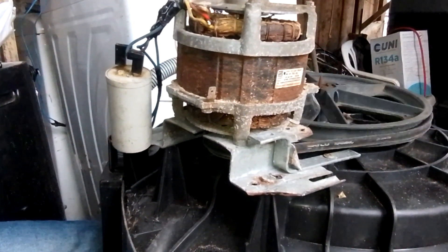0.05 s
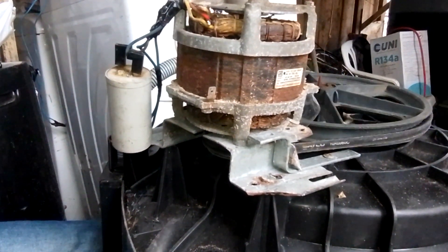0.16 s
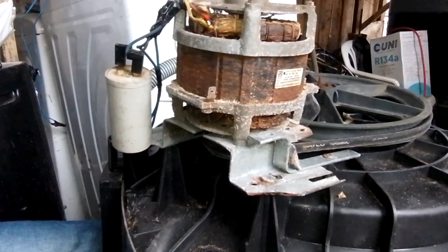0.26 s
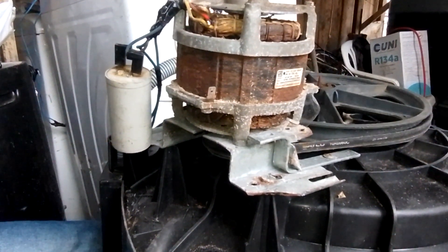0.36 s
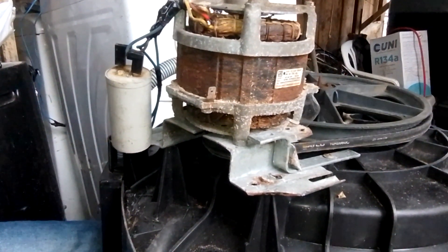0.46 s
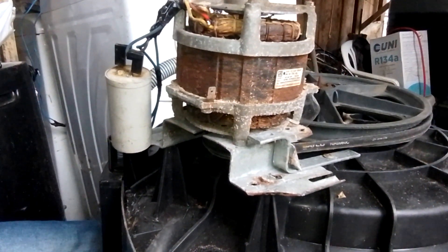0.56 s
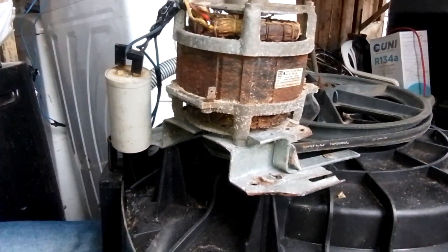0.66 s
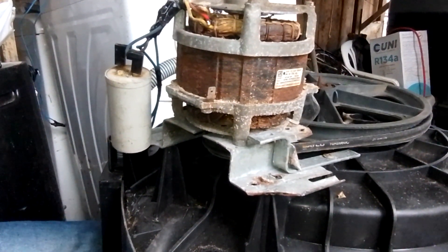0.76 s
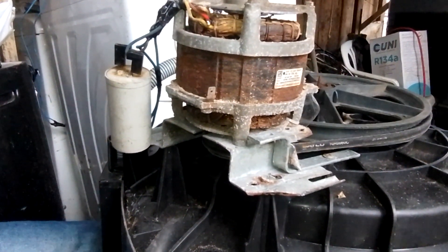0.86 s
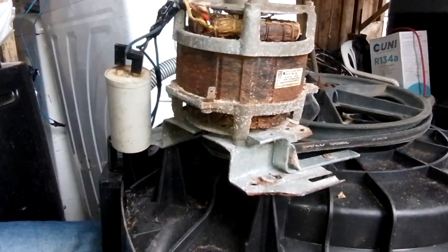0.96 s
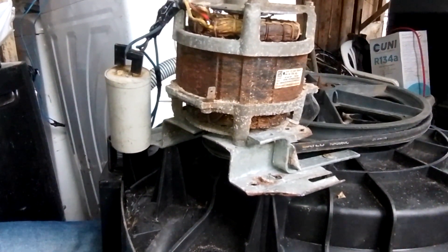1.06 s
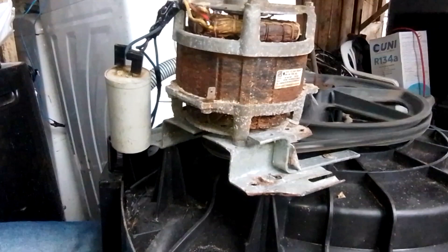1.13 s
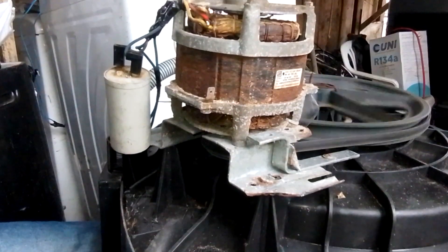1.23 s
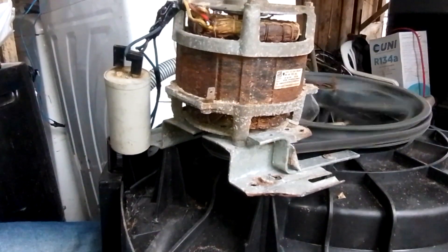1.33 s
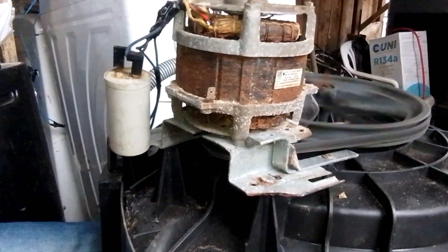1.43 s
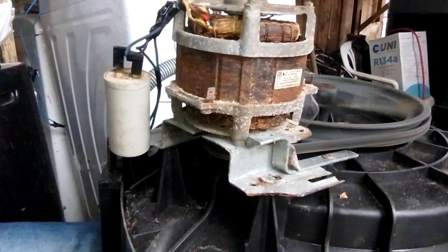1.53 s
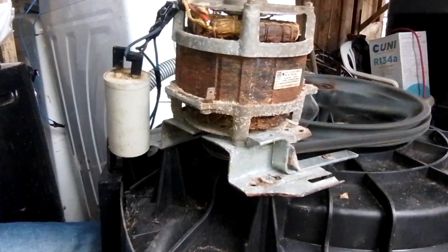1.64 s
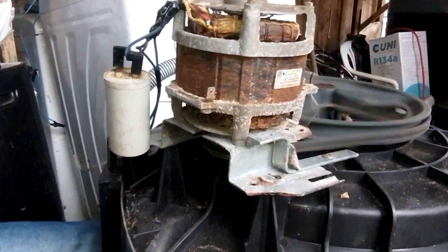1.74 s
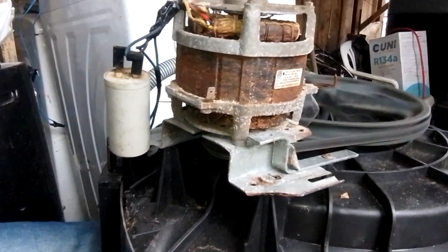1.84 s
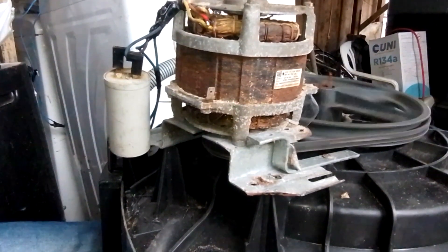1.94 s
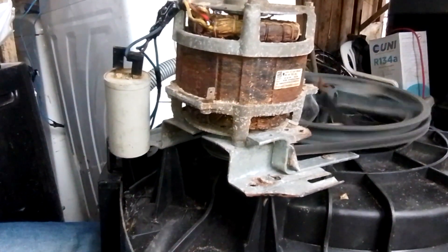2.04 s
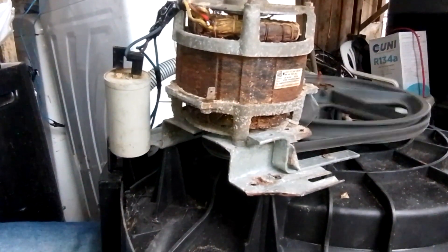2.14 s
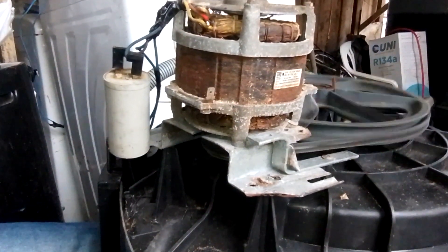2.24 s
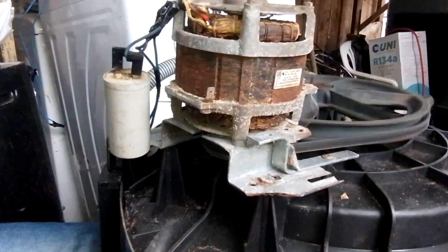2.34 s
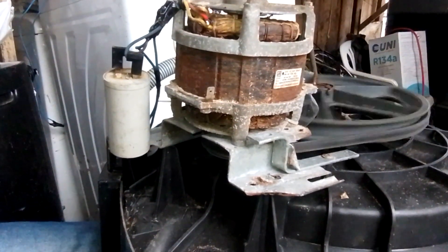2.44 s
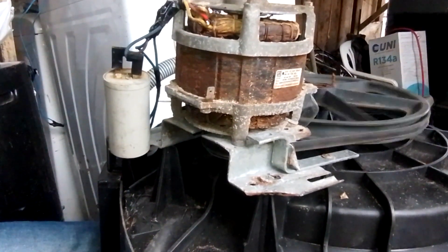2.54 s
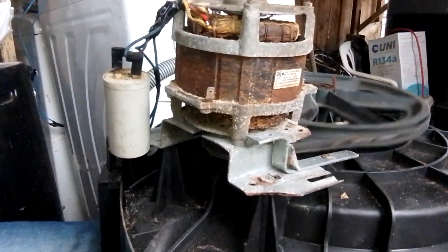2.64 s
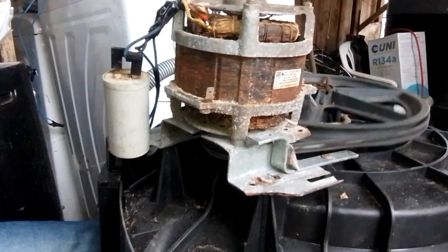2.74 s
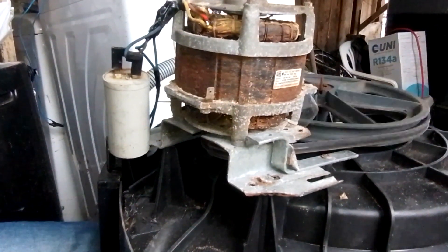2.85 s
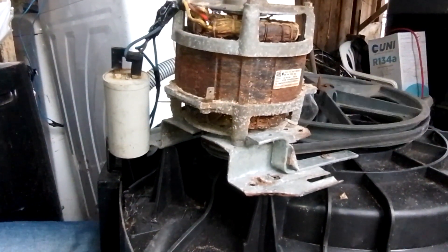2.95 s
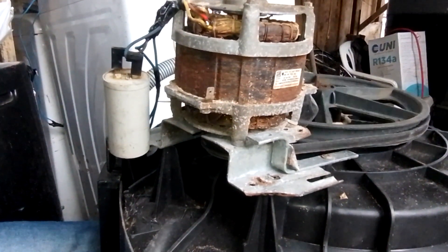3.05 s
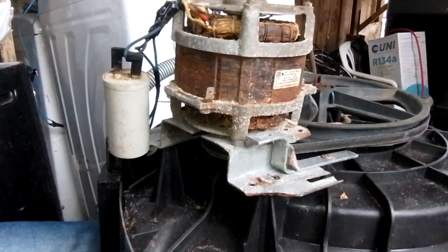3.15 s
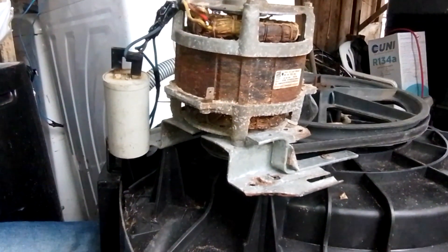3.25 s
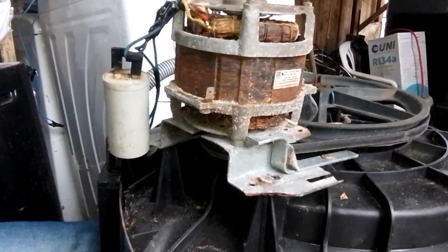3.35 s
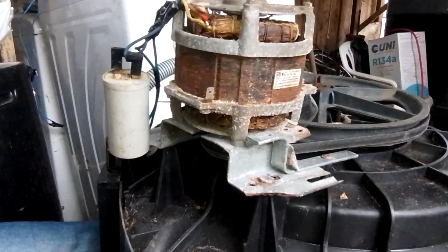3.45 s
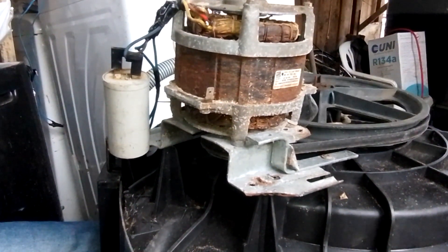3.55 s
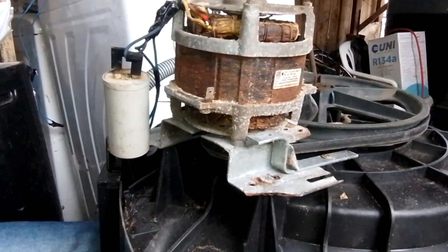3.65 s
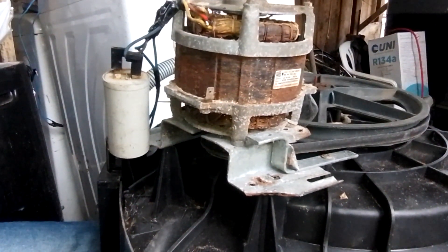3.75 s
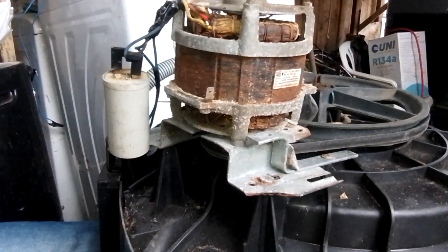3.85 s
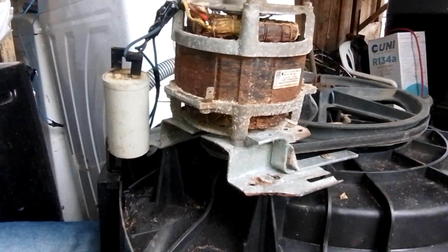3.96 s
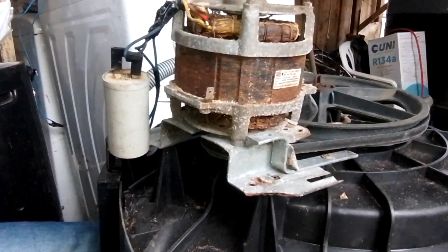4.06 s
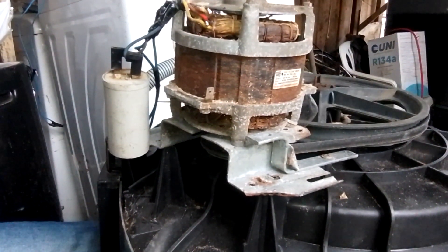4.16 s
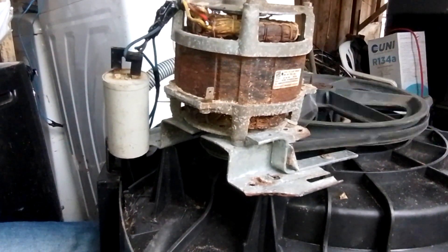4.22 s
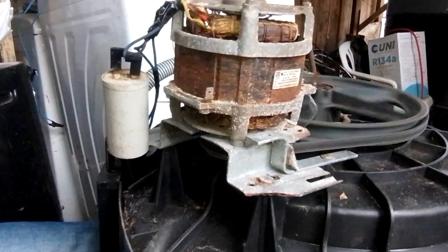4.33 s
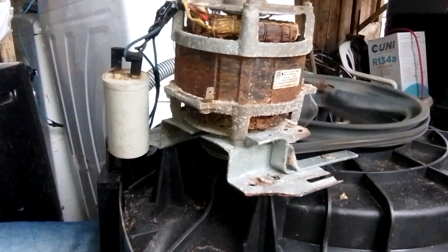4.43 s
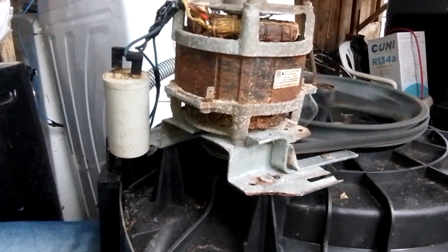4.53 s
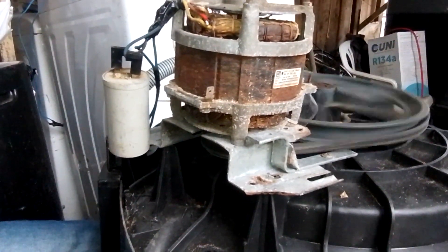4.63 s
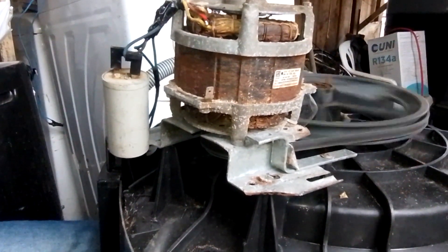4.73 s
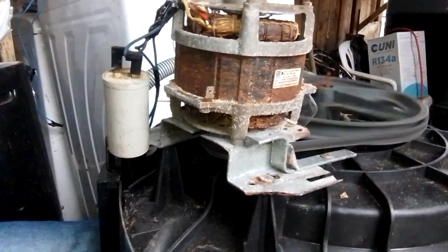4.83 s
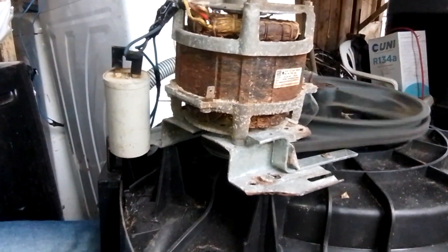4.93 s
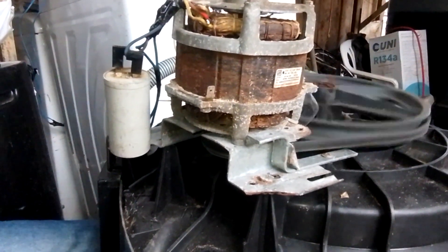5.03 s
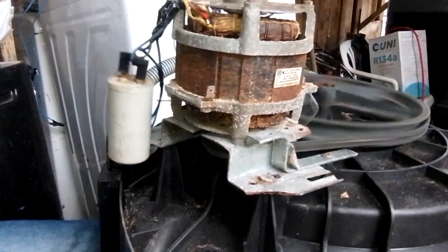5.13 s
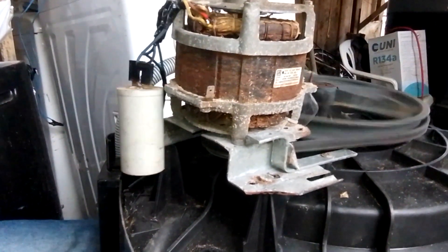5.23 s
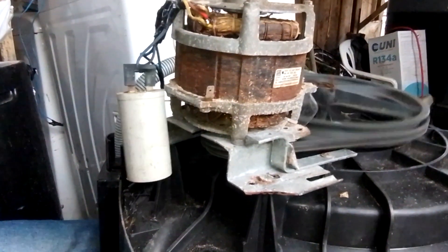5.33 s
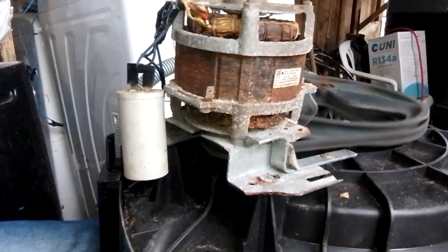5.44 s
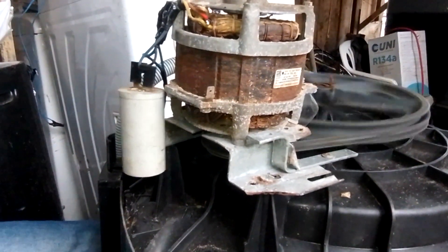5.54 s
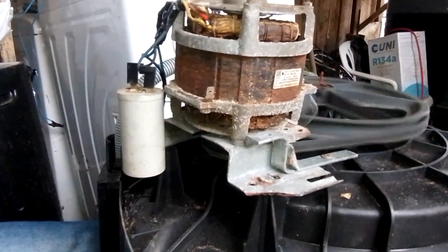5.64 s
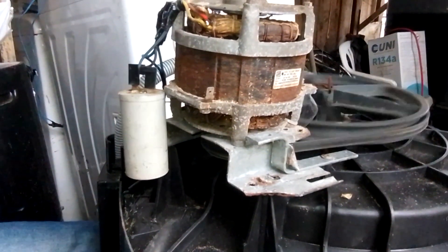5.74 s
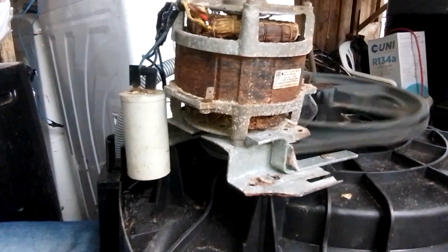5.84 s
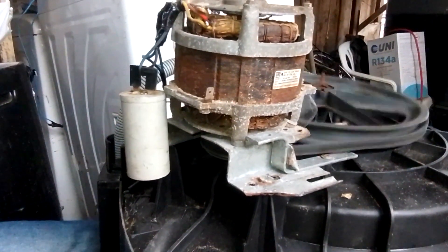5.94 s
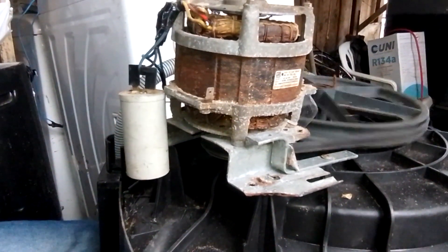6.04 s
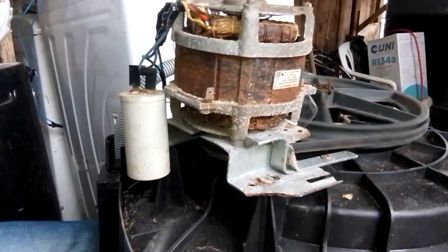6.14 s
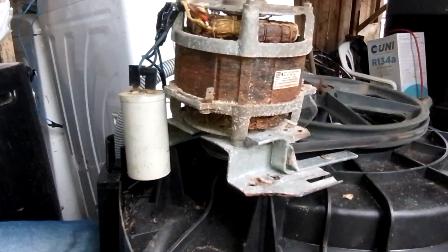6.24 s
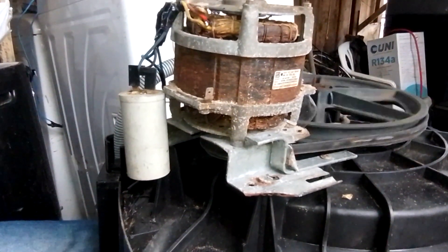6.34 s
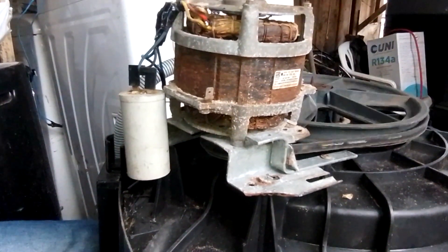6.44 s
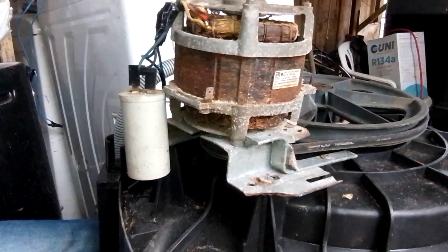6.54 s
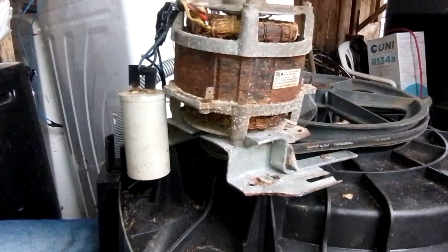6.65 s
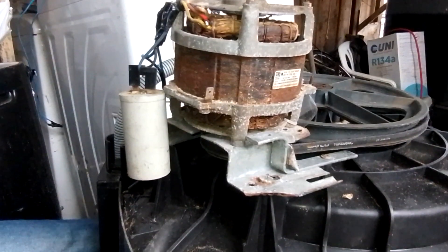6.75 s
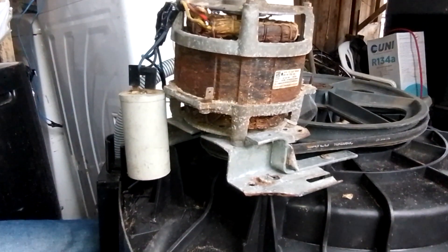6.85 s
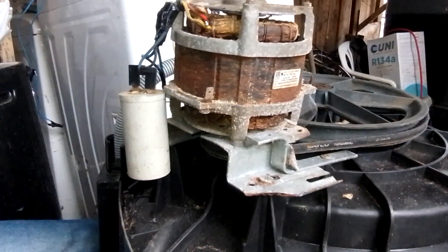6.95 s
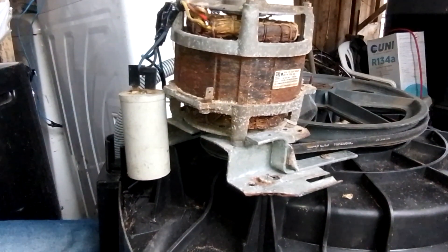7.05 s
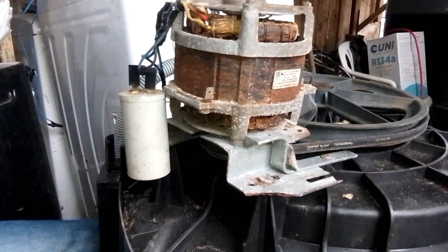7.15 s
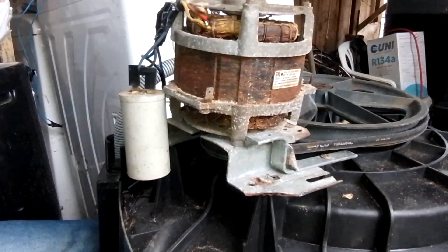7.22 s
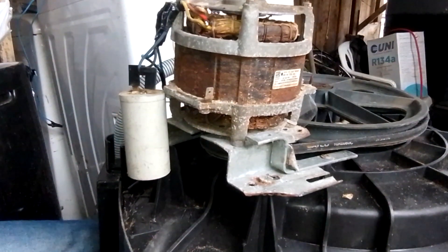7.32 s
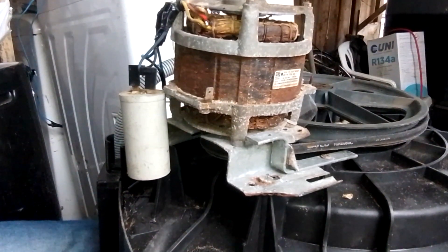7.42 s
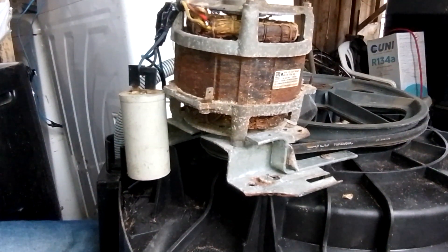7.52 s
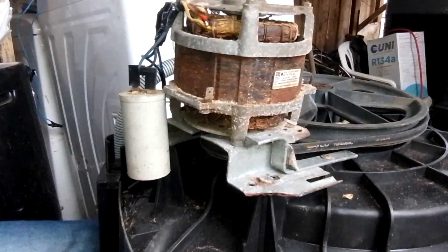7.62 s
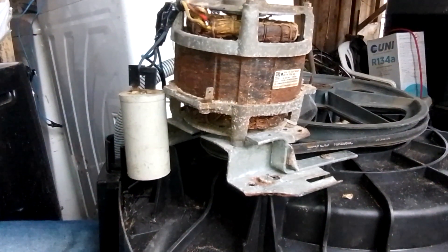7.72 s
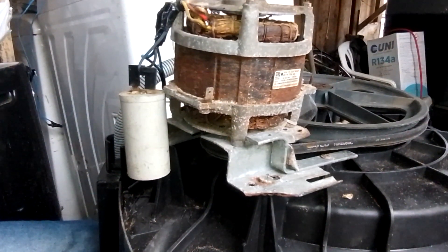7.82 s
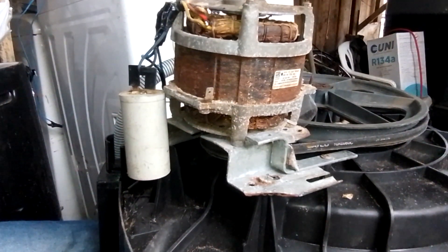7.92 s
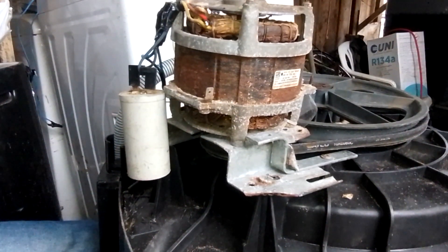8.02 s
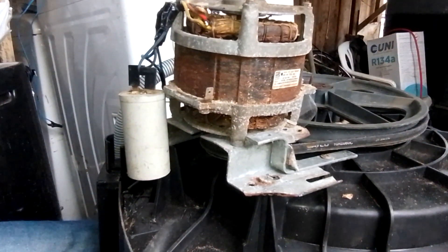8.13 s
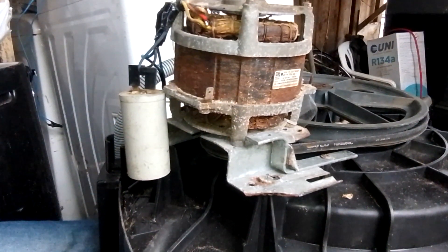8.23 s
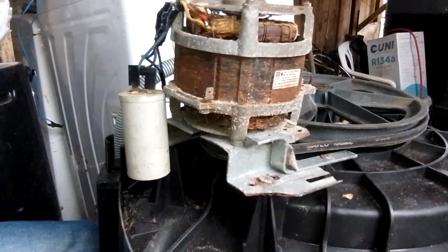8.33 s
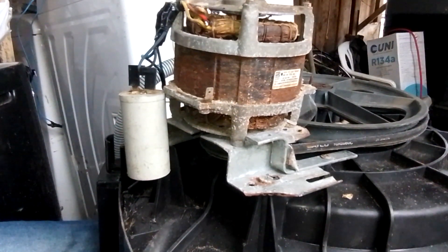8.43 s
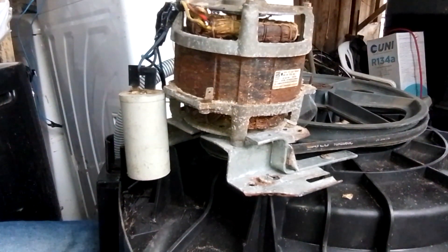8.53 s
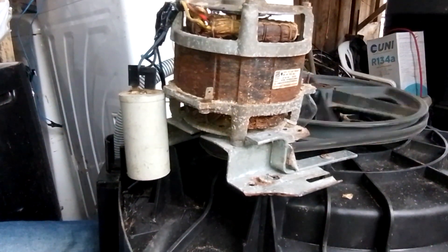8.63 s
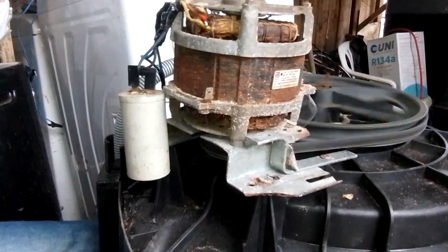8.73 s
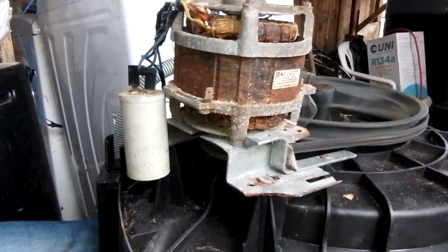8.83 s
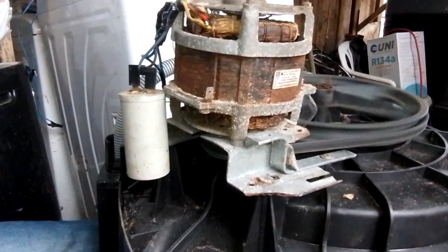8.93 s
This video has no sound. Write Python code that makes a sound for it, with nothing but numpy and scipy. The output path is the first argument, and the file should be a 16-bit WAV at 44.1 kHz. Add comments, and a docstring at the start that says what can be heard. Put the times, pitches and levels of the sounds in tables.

```python
"""Worn motor on a plastic tub

In a quiet shed, close to the microphone, a worn electric motor is run up three times, belting a pulley round.
Bearing chatter, made of random taps, rings the frame, tub and races as resonances over a hum of sine tones.
In the first two runs short pushes and puffs make the pulley's knocks, which spread out and stop.
Fingers click on the switch as filtered noise; drone, murmur, a thin chirr and faint tones fill the shed."""
import sys
import numpy as np
from scipy.fft import rfft, irfft, next_fast_len
from scipy.io import wavfile
from scipy.ndimage import uniform_filter1d, map_coordinates

SR = 44100
rng = np.random.default_rng(int(sys.argv[2]) if len(sys.argv) > 2 else 0)


def to_wav(s):
    """Save 16-bit WAV."""
    ch = np.atleast_2d(s).T  # columns
    pcm = np.round(np.clip(ch, -1, 1) * 32767)  # PCM
    wavfile.write(sys.argv[1], SR, pcm.astype(np.int16))


N = 396018  # samples, about 9 s

# knocks of the turning pulley: (t/s, relative snap level/dB, relative tub thump level/dB)
KNOCKS = [(1.1269, -14.5, -13), (1.314, -9, -13.5), (1.491, -11, -17), (1.5527, -16, -17.5),
          (1.6707, -17.5, -17.5), (1.7173, -15.5, -16.5), (1.7686, -12, -17), (1.8196, -17, -17),
          (1.8702, -14.5, -19.5), (1.9212, -19, -18), (1.9686, -14, -18), (2.014, -17, -13),
          (2.0577, -15, -14.5), (2.1025, -13, -14.5), (2.148, -18, -17.5), (2.1946, -16.5, -16),
          (2.2417, -25.5, -21.5), (2.2943, -21, -17.5), (2.357, -24.5, -17), (2.4201, -30, -25),
          (2.4598, -36, -35), (2.5219, -41, -34), (4.9714, -13, -13.5), (5.0131, -12.5, -10),
          (5.0672, -18.5, -19), (5.1124, -9, -16.5), (5.1583, -9, -13), (5.2043, -14.5, -15),
          (5.2533, -21, -11), (5.2951, -16.5, -14.5), (5.3455, -15.5, -16), (5.388, -14, -14.5),
          (5.4309, -14, -15), (5.477, -19, -17), (5.5233, -12, -14), (5.5636, -10, -15),
          (5.611, -12, -13.5), (5.6571, -13.5, -19.5), (5.7048, -15, -37), (5.754, -18.5, -15.5),
          (5.8132, -28, -16), (5.8789, -52, -24.5), (5.9648, -64.5, -38), (6.0534, -69, -49)]
# resonances of the steel frame: (f/Hz, width/Hz, level/dB)
FRAME_MODES = [(1510, 20, -7), (1693, 28, -9), (2054, 16, -4), (2158, 35, -6), (2280, 27, -5),
               (2406, 20, -3), (2718, 25, -4), (2795, 45, -1), (3050, 60, -5), (3244, 35, 1),
               (3367, 60, -7), (3640, 110, -12), (4190, 96, -14), (4690, 140, -14), (5260, 60, -12),
               (5910, 130, -13)]


def amp(db):
    """Amplitude factor of a level in dB."""
    return 10 ** (np.asarray(db) / 20)


def unit(x):
    """x brought to an RMS of one."""
    return x / np.sqrt(np.mean(x ** 2) + 1e-20)


def curves(rows, t):
    """Each column after the time, read at the times t."""
    s, *columns = np.transpose(rows)
    return np.array([np.interp(t, s, column) for column in columns])


def wobble(rate):
    """A smooth random curve, rate knots a second."""
    knots = rng.standard_normal(int(N * rate / SR) + 4)
    return map_coordinates(knots, [np.arange(N) * rate / SR])


def bump(s, width_s):
    """A smooth rise and fall around a moment."""
    return np.exp(-.5 * ((np.arange(N) / SR - s) / width_s) ** 2)


def filtered(x, response):
    """x passed through a complex response of frequency."""
    m = next_fast_len(N + SR // 2)
    return irfft(rfft(x, m) * response(np.fft.rfftfreq(m, 1 / SR)), m)[..., :N]


def modes(table):
    """The causal response of a body with these resonances, their signs alternating."""
    def response(f):
        total = 0
        for k, (centre, width, db) in enumerate(table):
            damping = 1j * f * abs(width)
            total = total + (-1) ** k * amp(db) * damping / (centre * centre - f * f + damping)
        return total
    return response


def colour(points):
    """The gain of (f/Hz, level/dB) points joined on a log frequency axis."""
    f, db = np.transpose(points)
    return lambda hz: amp(np.interp(np.log(hz + 1), np.log(f + 1), db))


def noise(response):
    """Steady random noise through a response, at an RMS of one."""
    return unit(filtered(rng.standard_normal(N), response))


def chatter(per_s, spread_db, lump_db, lump_rate, response):
    """Dense random taps of uneven but bounded size, in lumps, strike a body; RMS of one."""
    size_db = spread_db * np.minimum(rng.exponential(size=N), 4)
    taps = (rng.random(N) < per_s / SR) * rng.standard_normal(N) * amp(size_db)
    return unit(filtered(taps * amp(lump_db * wobble(lump_rate)), response))


def bursts(times, db, t60):
    """A sharp-fronted, decaying puff of noise at each time, cut off after 0.2 s."""
    out, t = np.zeros(N + SR), np.arange(SR // 5) / SR
    for s, level_db, life in np.broadcast(times, db, t60):
        puff = amp(level_db - 60 * t / max(life, .002)) * rng.standard_normal(len(t))
        out[round(s * SR):][:len(t)] += puff
    return out[:N]


def blows(times, db):
    """A single push at each time."""
    out = np.zeros(N)
    out[np.round(times * SR).astype(int)] = amp(db)
    return out


def shed():
    """The quiet air of the shed: drifting noise bands and faint, unsteady sine tones."""
    # the changing air: (t/s, low drone level/dB, murmur level/dB)
    air = [(0, -78, -70.5), (2.8, -83.5, -71.5), (3.65, -77.5, -68), (6.2, -87, -72.5), (6.65, -87.5, -74),
           (6.8, -86, -70), (7.4, -85.5, -70), (7.7, -77.5, -67), (8.05, -86.5, -72.5)]
    # spectrum of the low drone: (f/Hz, relative level/dB)
    drone_colour = [(12, -41.5), (20, -14.5), (49, -5), (76, 2.5), (140, -5.5), (168, -12), (200, -2.5),
                    (260, -30.5), (440, -120)]
    # spectrum of the murmur: (f/Hz, relative level/dB)
    murmur_colour = [(100, -44.5), (170, -22.5), (253, -3.5), (406, -6), (600, -12), (950, -16.5),
                     (1330, -17.5), (2100, -23.5), (4000, -25.5), (8000, -31.5), (15700, -43.5)]
    # bands of a thin far chirr: (f/Hz, width/Hz, level/dB)
    chirr_modes = [(4925, 81, -1), (7440, 340, -7)]
    # faint tones of the shed: (f/Hz, mean level/dB)
    far_hum = [(102.3, -85.5), (145.3, -88), (199.2, -87), (253.0, -80.5)]
    t = np.arange(N) / SR
    drone_db, murmur_db = curves(air, t)
    drone = amp(drone_db + 1.5 * wobble(0.99)) * noise(colour(drone_colour))
    murmur = amp(murmur_db + 0.79 * wobble(17)) * noise(colour(murmur_colour))
    chirr_db = -86 + 1.2 * wobble(9.5) + 2.2 * wobble(1.6)
    chirr = amp(chirr_db) * noise(lambda f: modes(chirr_modes)(f) ** 2)
    drift_db = .8 * (drone_db - drone_db.mean())  # the tones follow most of the drone's drift
    tones = 0
    for hz, db in far_hum:
        level = amp(db + drift_db + 2.5 * wobble(1.0))
        tones = tones + level * np.sin(2 * np.pi * hz * t + 1.5 * wobble(3))
    return drone + murmur + chirr + tones


def clicks():
    """Light contacts of fingers and switch: a bright tick over a small hollow knock."""
    # clicks: (t/s, relative tick level/dB, low knock over that/dB, tick's 60 dB decay/s)
    contacts = [(0.137, -66.5, 15.5, 0.039), (0.4637, -51.5, -16, 0.033), (2.7344, -46.5, -17, 0.028),
                (3.484, -49, -6.5, 0.017), (3.5518, -51.5, -3.5, 0.049), (3.5788, -43.5, -0.5, 0.036),
                (7.007, -55, -3, 0.03), (7.5845, -54.5, 5.5, 0.0406), (7.8795, -56, -21, 0.025),
                (7.93, -44.5, -8, 0.05), (7.9839, -58, 6.5, 0.044)]
    s, db, low_db, t60 = np.transpose(contacts)
    tick = filtered(bursts(s, db - 7.0, t60), modes([(5060, 11000, 0)]))
    hollow = filtered(bursts(s, db + low_db + 9.5, 2.0 * t60), modes([(900, 450, 0)]))
    return tick + hollow


def swish():
    """A thin swish as the belt stops: high narrow noise that swells and goes."""
    # swell of the swish: (t/s, width/s, level/dB)
    belt_stops = [(6.03, .045, -71)]
    level = sum(amp(db) * bump(s, width_s) for s, width_s, db in belt_stops)
    return level * noise(lambda f: modes([(8300, 2400, 0)])(f) ** 3)


def starts():
    """The housing moans briefly as current arrives and the rotor jerks, and the contacts spark."""
    # jerks: (t/s, relative moan level/dB, spark over that/dB)
    jerks = [(0.617, -39, 8.5), (3.693, -31, -22.5), (8.077, -46.5, -6), (8.088, -33, -9)]
    s, db, spark_db = np.transpose(jerks)
    moan = filtered(bursts(s, db + 24.0, .15), lambda f: modes([(605, 50, 0)])(f) ** 2)
    spark = filtered(bursts(s, db + spark_db - 1, 0.05), modes([(6500, 4400, 0.017)]))
    return moan + spark


def shaking():
    """dB of tub, bell, frame, bearings and hum: each run spins up and holds; the first two
    coast and halt, the third is still running at the end."""
    # runs: (switched on t/s, switched off t/s, standstill t/s, steel quiet earlier by/s,
    #        tub offset/dB, bell offset/dB, fades while coasting of bell, frame and bearings/(dB/s));
    # the last switch-off and standstill lie beyond the end
    runs = [(0.618, 1.2, 2.7, -0.015, 0.5, -20, 44, 22, 14),
            (3.696, 4.92, 6.14, 0.05, 0.68, -22.5, 35, 28, 26), (8.084, 9.5, 11, 0, -2, -19, 25, 25, 20)]
    # every spin-up; the tub goes on building for a second:
    # (t/s after switching on, tub level/dB, bell relative level/dB, frame level/dB,
    #  bearing level/dB, hum level/dB)
    spin_up = [(0, -59, -54, -72, -81, -80), (.02, -55, -51, -70.5, -60.5, -68),
               (.045, -28, -26.5, -57, -53.5, -75), (.07, -30, -8, -38, -41, -57),
               (.1, -27, -5, -33.5, -36, -54.5), (.14, -26, -5, -20.5, -29, -50.5),
               (.19, -28.5, -1, -21, -27.5, -52), (.4, -25, 0, -20, -28, -46.5),
               (.7, -21.5, 0.5, -21.5, -28.5, -49), (1.1, -19.5, 2.5, -24, -28.5, -51)]
    # shape of a halt, added to the fade: (t/s from standstill, tub, bell, frame, bearing change/dB)
    halt = [(-.6, 0, 1, -0.5, 0), (-.4, -1, -4.5, -3, -7.5), (-.28, -9, 7, -3, -12),
            (-.2, -18, -5.5, -17.5, -22.5), (-.1, -22.5, -26, -42, -33), (-.03, -45.5, -40, -49, -43),
            (.05, -54.5, -60, -60, -60), (.25, -70, -70, -70, -70)]
    hum_lingers = 0.59  # the hum halts with the tub, but more gently
    unpowered_db, unpowered_s = -2.5, .08  # the hum drops when the current stops
    t, out = np.arange(N) / SR, np.full((5, N), -150.0)
    for on, off, still, early_s, tub_db, bell_db, *fades in runs:
        inside = (t >= on) & (t < still + halt[-1][0])
        now = t[inside]
        coasting = np.maximum(now - off, 0)
        tub = curves(halt, now - still)[0]
        steel = curves(halt, now - still + early_s)[1:]
        bell, frame, race = steel - np.outer(fades, coasting)
        hum = hum_lingers * tub + unpowered_db * np.minimum(coasting / unpowered_s, 1)
        changes = [tub + tub_db, bell + bell_db, frame, race, hum]
        out[:, inside] = curves(spin_up, now - on) + changes
    return out


def windings():
    """The windings hum at twice the mains, with overtones and the tub's lowest sway around them."""
    # overtones of the hum, carried well by the tub: (multiple of the hum, level over it/dB)
    overtones = [(2, 10), (3, 13.5), (4, 7.5)]
    hum_hz = 120
    hum_db = shaking()[4] + 0.91 * wobble(5)
    phase = 2 * np.pi * hum_hz * np.arange(N) / SR + 0.81 * wobble(6.1)
    line = np.sin(phase) + sum(amp(db) * np.sin(k * phase) for k, db in overtones)
    sway = noise(lambda f: modes([(121, 22, 0)])(f) ** 2)
    return amp(hum_db) * (amp(-2.0) * line + amp(1.0) * sway)


def tub_body(f):
    """The tub's resonances; being small, it radiates little bass."""
    # resonances of the tub: (f/Hz, width/Hz, level/dB)
    tub_modes = [(245, 38, -7.5), (311.9, 35, -2.5), (368, 22, 1), (487, 62, -3.5), (627, 65, -7.5),
                 (674, 23, -4.5), (815, 90, -12), (1320, 230, -17)]
    return modes(tub_modes)(f) * (f * f / (190 ** 2 - f * f + 1j * f * 240)) ** 2


def dulled(x, frame_db):
    """Slow parts strike softly: the top of the tub's sound closes as the chatter dies."""
    dull_hz, dull_from_db, dull_slope = 600, -46, 0.51  # slope: dB of top per dB of frame level
    low = filtered(x, lambda f: 1 / (1 + (f / dull_hz) ** 4))
    return low + amp(dull_slope * np.minimum(frame_db - dull_from_db, 0)) * (x - low)


def knocks():
    """Each knock is a short snap that rings the frame, then a thump and rattle of the tub."""
    # resonances of the snap: (f/Hz, width/Hz, level/dB)
    snap_modes = [(900, 270, 2), (2720, 900, -16), (5400, 3600, -15.5)]
    s, db, thump_db = np.transpose(KNOCKS)
    push = blows(s + 0.0019, thump_db + 29) + bursts(s, thump_db + 16, 0.06)
    thump = filtered(push, lambda f: tub_body(f) / (1 + 1j * f / 1300) ** 2)
    hit = blows(s, db + 24) + blows(s + .0015, db + 20) + bursts(s, db + 5.5, 0.022)

    def softness(f):
        """Plastic is too soft for the top."""
        return modes([(5500, 7000, 0)])(f) / (1j * f / 7000 + 0.17) / (1 + (f / 7500) ** 8)

    hit = filtered(hit, softness)
    snap = filtered(hit, modes(snap_modes))
    ring = amp(-4.5) * filtered(hit, modes(FRAME_MODES))
    return dulled(thump, shaking()[2]) + snap + ring


def lull(frame_db):
    """dB by which the shaking lifts after a knock, then sags: none at speed, deep while coasting."""
    t, s = np.arange(N) / SR, np.transpose(KNOCKS)[0]
    since = t - s[np.maximum(np.searchsorted(s, t) - 1, 0)]
    slack = np.clip((-32.5 - frame_db) / 16, 0, 1)
    swing_db = slack * (5 - 270 * np.minimum(since, .06))
    sag_db = np.where((since > 0) & (since < .12), swing_db, 0)
    return uniform_filter1d(sag_db, size=180)  # smoothed over about 4 ms


def bell(bell_db):
    """The frame's sharpest mode sings almost steadily, with a fast flutter and a fuzzy edge."""
    # the fuzzy edge: (f/Hz, width/Hz, level/dB)
    bell_modes = [(1183, 83, 0)]
    # moments when the bell rings up or drops out: (t/s, width/s, level change/dB)
    swells = [(1.0, 0.011, -3), (1.3, 0.085, -4), (1.62, 0.11, 11), (3.77, .02, -5), (3.95, 0.015, -8.5),
              (5.04, 0.015, -7), (5.1, 0.024, 5.5), (8.35, 0.067, 2)]
    sing_hz, flutter_hz = 1182, 63
    t = np.arange(N) / SR
    bell_db = bell_db + 2 * wobble(14)
    bell_db = bell_db + sum(db * bump(s, width_s) for s, width_s, db in swells)
    flutter = 1 + 0.38 * np.sin(2 * np.pi * flutter_hz * t + 1.2 * wobble(5))
    sing = np.sqrt(2) * np.sin(2 * np.pi * sing_hz * t + 1.6 * wobble(12)) * flutter
    fuzz = noise(lambda f: modes(bell_modes)(f) ** 2)
    return amp(bell_db) * (amp(-2.0) * sing + amp(-4.0) * fuzz)


def motor():
    """The chatter of the turning parts, heard through tub, frame and bearing races."""
    # resonances of the bearing races: (f/Hz, width/Hz, level/dB)
    race_modes = [(6780, 400, -5), (8030, 380, -2.5), (8800, 230, 1), (9120, 170, 0.5), (9410, 350, -2)]
    # spectrum of the rush of air and belt: (f/Hz, relative level/dB)
    rush_colour = [(18, -59.5), (30, -43), (70, -25), (150, -28.5), (333, -7.5), (973, -3.5), (1600, -8.5),
                   (2900, -2), (3890, -15), (6500, -27), (9000, -38), (15700, -68.5)]
    # spectrum of the highest fizz: (f/Hz, relative level/dB)
    fizz_colour = [(5000, -29.5), (9000, -1), (10500, -0.5), (12200, -2.5), (13000, -8), (15700, -17)]
    tub_db, bell_db, frame_db, race_db, _ = shaking()
    tub_db = tub_db + 0.74 * wobble(12)  # the tub surges
    sag_db = lull(frame_db)
    beat = amp(0.44 * wobble(22))  # the load on the bearings varies

    tub = chatter(1500, 1.1, 0.98, 40, lambda f: tub_body(f) / (1 + 1j * f / 2500))
    tub = dulled(amp(tub_db + sag_db) * tub, frame_db)
    frame = chatter(3000, 1.0, 1.2, 60, modes(FRAME_MODES))
    frame = amp(frame_db - 0.05 + .7 * sag_db) * frame
    race = chatter(8000, 0.71, 0.77, 60, modes(race_modes))
    race = amp(race_db + 1.16 + 0.29 * sag_db) * race
    # air and belt fill the gaps between the resonances, growing with the tub and frame
    rush_db = 0.27 * tub_db + 0.53 * frame_db - 6.5 + 0.33 * sag_db
    rush = amp(rush_db) * noise(colour(rush_colour))
    # the belt's rustle lasts longer into the coast than the steel's chatter
    belt_db = 0.5 * tub_db + .45 * frame_db - 13.5 + .6 * sag_db
    belt = amp(belt_db) * chatter(5000, 1.2, 0.96, 50, lambda f: modes([(5000, 2500, 0)])(f) ** 2)
    # the highest fizz fades further than the bearing hiss as the sound dies away
    fizz = amp(1.153 * race_db - 3.0) * chatter(9000, 1.8, 0.94, 56, colour(fizz_colour))
    return beat * (tub + frame + race + rush + belt + fizz) + bell(bell_db)


def scene():
    """The shed, the small sounds around the motor, and the motor itself, on one channel."""
    background = shed() + clicks() + swish() + starts()
    return (background + windings() + knocks() + motor())[None]


def record(dry):
    """The microphone hisses faintly, its low end has a narrow dip, and its top is cut off."""
    top_hz = 15730
    dip = lambda hz: 1 - 0.43 * modes([(165, 45, 0)])(hz)
    hiss = amp(-83.5) * rng.standard_normal(N)
    return filtered(dry + hiss, lambda hz: dip(hz) * (hz < top_hz))


dry = scene()
out = record(dry)
to_wav(out)
```